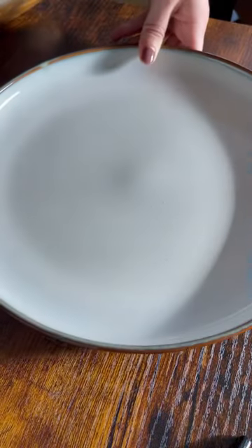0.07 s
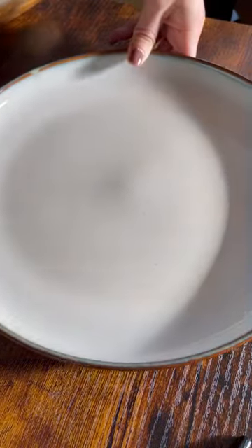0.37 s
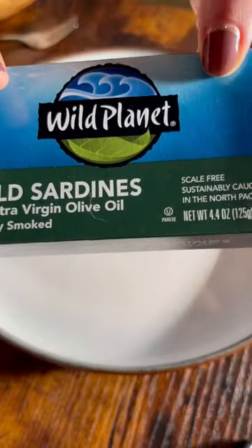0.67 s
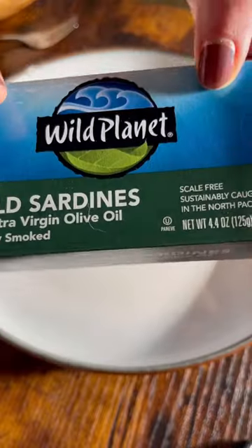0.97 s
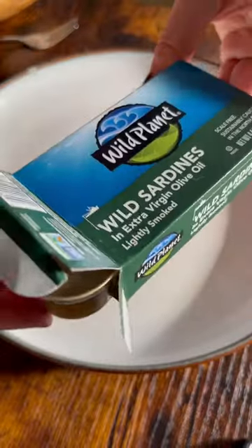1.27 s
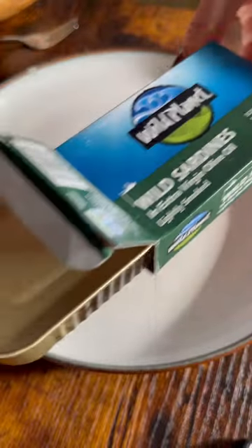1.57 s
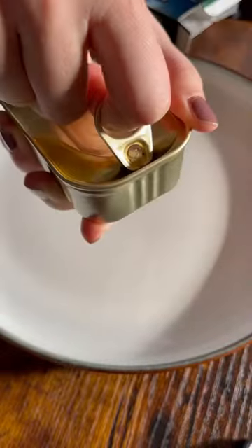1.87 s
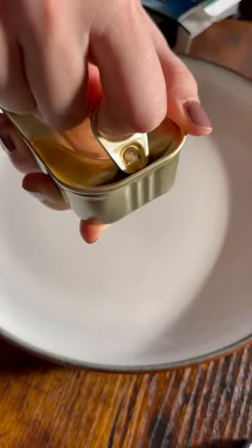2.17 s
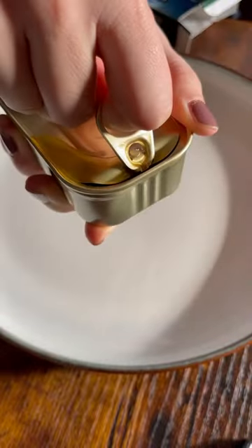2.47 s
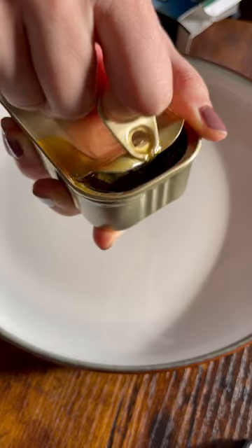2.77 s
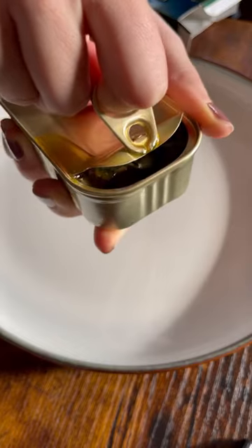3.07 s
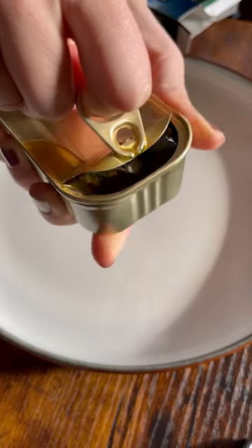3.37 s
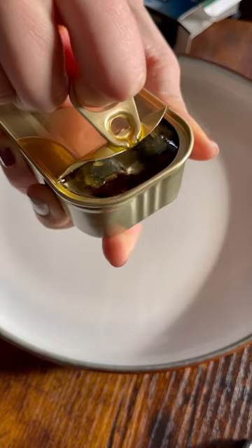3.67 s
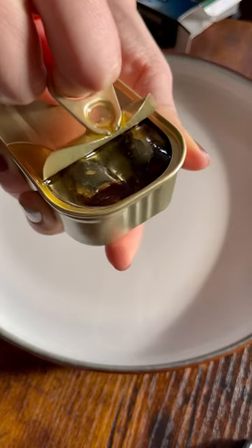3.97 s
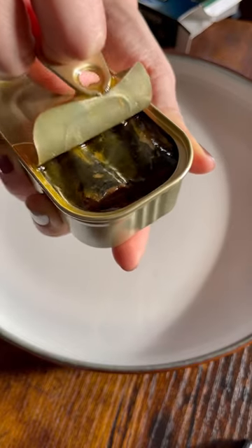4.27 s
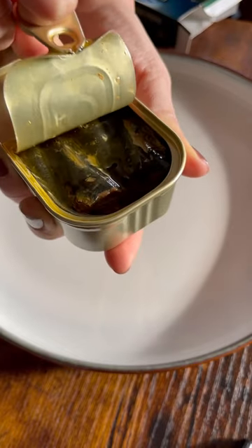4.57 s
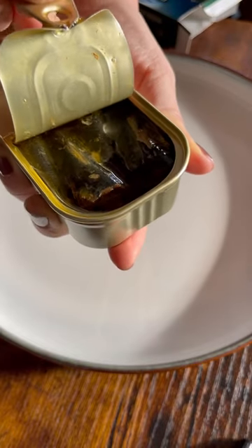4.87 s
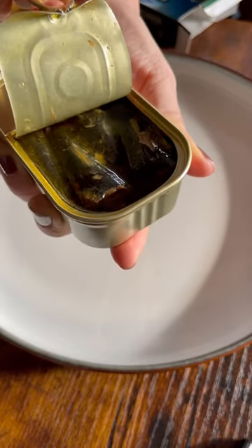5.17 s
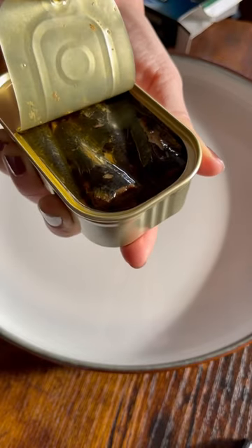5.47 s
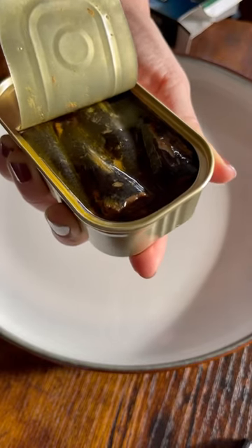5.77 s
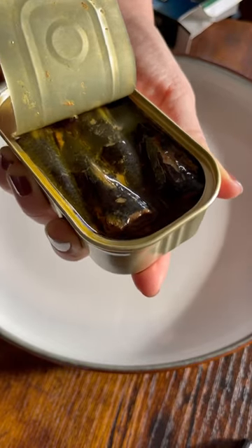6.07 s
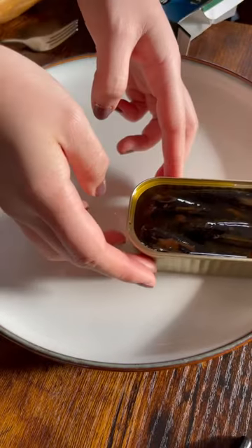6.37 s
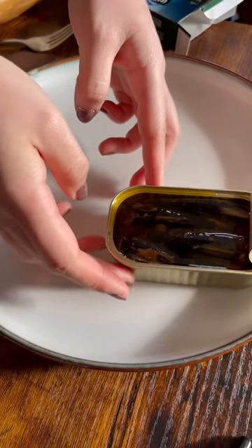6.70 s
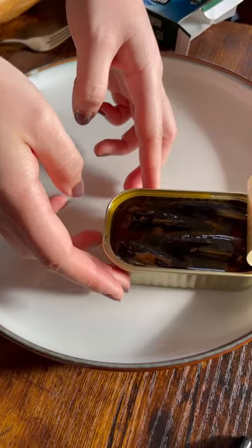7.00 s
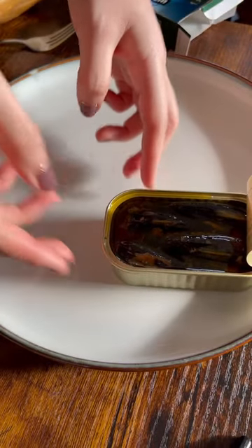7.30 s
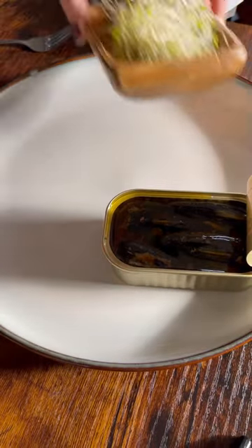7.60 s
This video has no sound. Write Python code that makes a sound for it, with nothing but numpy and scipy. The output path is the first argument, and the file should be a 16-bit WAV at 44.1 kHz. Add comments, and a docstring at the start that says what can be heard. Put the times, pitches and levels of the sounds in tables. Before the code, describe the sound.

Close up in a small, faintly humming room, a plate slides across a wooden table with low thumps. Nails click on a carton and a tin rasps out. A loud, sharp pop breaks the tin's seal, and the lid peels away in surges of thin metallic crackles that get lower and sparser. Finally the tin lands on the plate with a clink and a table thud.

```python
"""A sardine tin is opened: the ring pull pops the seal and the lid tears along its score in small snaps,
its resonance sinking as it comes free. Before that, a plate grinds over a booming wooden table, a fork
jiggles, nails tap a cardboard box and the tin scrapes out of it. Last, the tin is set on the plate.
The loudest hits overload a close microphone; an appliance hums in the small room."""
import sys
import numpy as np
from scipy import signal
from scipy.fft import rfft, irfft
from scipy.io import wavfile
from scipy.ndimage import uniform_filter1d

SR = 44100
rng = np.random.default_rng(int(sys.argv[2]) if len(sys.argv) > 2 else 0)


def transcribe(u):
    """Save the signal u as a 16-bit wav file named by the first command-line argument.

    u: samples, shape (n,) or (channels, n), limited to [-1, 1]; the rate is SR.
    q: integer samples, one column per channel.
    """
    v = np.clip(np.atleast_2d(u).T, -1, 1)
    q = np.round(v * 32767).astype(np.int16)
    wavfile.write(sys.argv[1], SR, q)


N = 345744

# The score gives way. Each row: start in seconds, level in dB.
LID_SNAPS = [(2.5457, -22.5), (2.5932, -9), (2.6695, -4.5), (2.6802, -8), (2.6947, -5), (3.1914, -22.5),
             (3.422, -21.5), (3.4626, -15.5), (3.6308, -19.5), (3.671, -19.5), (3.7851, -18.5),
             (3.8074, -14), (3.8337, -14), (3.863, -16), (3.9, -18.5), (3.9506, -16), (3.991, -16),
             (4.021, -10.5), (4.0359, -7), (4.0554, -7.5), (4.1595, -11), (4.179, -7.5), (4.248, -7.5),
             (4.3089, -11), (4.3452, -18.5), (4.4092, -23), (4.5612, -12.5), (4.725, -14.5), (4.821, -25),
             (5.0485, -21), (5.1273, -13.5), (5.337, -15.5), (5.403, -12), (5.4681, -21), (5.5663, -14),
             (5.6298, -17.5), (5.822, -21), (6.0135, -12)]
# Peeling surges. Each row: peak time in seconds, slip level in dB, rise and fall in seconds.
LID_PULLS = [(2.55, -20, 0.035, 0.098), (2.715, -14.5, 0.1, 0.022), (3.45, -19.5, 0.041, .035),
             (3.82, -21.5, 0.074, 0.063), (4.04, -11.5, 0.061, 0.069), (4.25, -19.5, 0.19, 0.26),
             (4.79, -24.5, 0.089, .07), (5.08, -31.5, 0.087, 0.14), (5.401, -28.5, 0.19, 0.17),
             (5.97, -32, 0.053, .08)]
# Main lid resonance. Each row: time in seconds, pitch in Hz, height in dB, tilt in dB/octave.
LID_TRACK = [(2.68, 3460, 5.5, 2), (3.45, 4150, -1, -1), (3.83, 3850, 13.5, -0.5), (3.96, 3540, 10.5, 1.5),
             (4.05, 3350, 2, 3), (4.25, 3010, 7.5, 2.5), (4.55, 2730, 3.5, -.5), (5.2, 2320, -1, 0.5),
             (6, 2030, 6.5, 1.5)]
# Lid peaks and dips. Each row: ratio to the main pitch, width in octaves, share of the height.
LID_PEAKS = [(.72, 0.11, -0.17), (.92, 0.15, 0.76), (1.04, 0.11, 1), (1.27, 0.27, -0.58), (1.62, .1, .45),
             (1.98, 0.072, 0.31), (2.75, 0.021, 0.52)]
# Lid edge buckling; seal cracking. Each row: start in seconds, energy in dB, decay in seconds.
LID_BUCKLES = [(2.6892, 0.5, 0.0033), (2.6954, 8, 0.0014), (2.702, -11, 0.0022)]
SEAL_POPS = [(2.2306, 23, 0.00091), (2.2326, 18.5, 0.0011)]
# Static resonances. Each row: centre in Hz, width in octaves, height in dB.
TIN_WALL_PEAKS = [(1286, 0.24, 9.5), (1810, 0.046, 0.5), (5270, 0.073, 1.5), (6070, 0.035, 2.5),
                  (8450, 0.054, -0.5), (11400, .04, 2)]
SEALED_LID_PEAKS = [(388, 0.08, 3), (1090, 0.44, 3.5), (1846, 0.24, 6.5), (2241, 0.36, 10),
                    (5330, 0.029, 4.5), (9700, .15, 5)]
SLEEVE_PEAKS = [(1030, 0.21, 4), (1580, 0.075, 5.5), (3000, 0.11, 4.8), (4000, .05, 2.2), (5140, .07, 2.9)]
# Source spectra. Each row: frequency in Hz, relative level in dB.
SNAP_SPECTRUM = [(100, -30), (600, 3), (1200, -0.5), (2200, -0.5), (4600, -0.5), (6200, 0), (8000, -4),
                 (9500, -8), (11000, -6.5), (14000, -14), (16000, -19.5)]
BUCKLE_SPECTRUM = [(200, -47), (1200, -82), (2100, -5), (2800, 4), (3300, -17), (3950, 10), (5100, -17),
                   (6200, 1.5), (7500, -0.5), (11000, -10), (13700, -5), (16000, -32)]
POP_SPECTRUM = [(60, -23.5), (350, -10), (580, -15.5), (1000, -6.5), (2200, -15), (3100, -15.5),
                (3900, -9.5), (5200, -13), (8000, -10), (10500, -12.5), (12000, -16), (16000, -17)]
POP_TAIL_SPECTRUM = [(200, -18.5), (700, -8.5), (1200, 1), (2100, 3), (3300, -6), (6500, -5.5),
                     (8200, -6.5), (10000, -9), (12000, -21.5), (16000, -19.5)]
CARD_SPECTRUM = [(100, -13), (400, -1), (700, -1.5), (1300, -0.5), (2000, -6), (3000, -1.5), (5500, -4.5),
                 (8000, -8), (12000, -16), (16000, -19)]
RIM_SPECTRUM = [(100, -42), (400, -16.5), (1000, -11.5), (1600, -10), (2300, -2), (3200, -6.5), (5200, -7),
                (8000, -13.5), (11000, -22.5), (16000, -22)]
NAIL_SPECTRUM = [(60, -35.5), (400, -2.5), (750, -5.5), (1700, 5), (3000, -3), (4500, -7), (8000, -13.5),
                 (12000, -23), (16000, -27)]
DRAG_SPECTRUM = [(30, -8), (90, 7.5), (160, -8.5), (350, 4.5), (550, -5.5), (1100, -6.5), (1700, -14.5),
                 (3000, -22.5), (6000, -38), (10000, -42.5), (16000, -47.5)]
AIR_SPECTRUM = [(15, -27), (25, -0.5), (93, -8), (193, -10.5), (227, -11), (260, -12), (281, -17.5),
                (389, -18), (482, -26), (848, -35), (1110, -35), (1710, -42.5), (2060, -43), (2300, -47.5),
                (15500, -60.5)]
# Tin on sleeve; rim on flap. Each: peak in dB, starting speed 0-1, drop once free in dB, fade in dB/s.
SLEEVE_STROKE = (-24, 0.04, 10.5, 91)
RIM_STROKE = (-16, 0.525, 23, 900)
# Nails on the box. Each row: start in seconds, level in dB, pitch ratio, click and thud in relative dB.
NAIL_TAPS = [(0.8005, 13, 0.97, 0.5, -12.5), (0.8208, 5, 1.26, -2, -13), (.8617, 0.5, 1.3, 2.5, -10),
             (.864, -1.5, 1.1, 4.5, 7.5), (0.9526, 12.5, 0.94, -6.5, -12.5), (0.9543, 10, 1.05, -9, -14.5),
             (0.9976, 10.5, 0.8, 5, -2.5)]
# Body modes. Each row: frequency in Hz, relative level in dB, T60 in seconds before added damping.
BOX_MODES = [(1260, -8.5, .009), (1680, 8, 0.021), (2045, 6.5, 0.013), (2350, -11.5, 0.003),
             (4100, 1, 0.0098)]
PANEL_MODES = [(247, -22.5, 0.033), (431.4, -7.5, .022), (498, -5.5, 0.023)]
FULL_TIN_MODES = [(1150, 10.5, 0.028), (1900, 5, 0.041), (2030, 11, 0.025), (2897, 5, 0.047),
                  (3150, -13, 0.04), (4500, -17, 0.011), (5730, -17, 0.016), (7100, -23, .02),
                  (9000, -20, 0.017)]
PLATE_MODES = [(673, -26, 0.071), (1065, -8.5, 0.085), (1520, -9, 0.2), (1856, 9, 0.14), (2536, -1.5, 0.15),
               (2891, 4, 0.089), (3176, -7, 0.088), (3622, -20.5, .17), (4150, 5.5, 0.085), (4340, 1, 0.08),
               (5600, 3.5, 0.08), (7250, -17, .2)]
FORK_MODES = [(2490, 0.5, 0.19), (3670, 0, 0.083), (4734, -12, 0.15)]
# Impacts and faint ticks. Each row: start in seconds, energy in dB, tilt in dB/octave.
TIN_STRIKES = [(6.356, -1, 3.5), (6.447, -23, -3)]
PLATE_STRIKES = [(6.3554, -3, -12.5), (6.444, -33, -6.5)]
FORK_STRIKES = [(.385, -22.5, 2), (0.409, -33, 20), (0.465, -29.5, 23), (0.477, -29, 10)]
DRY_TICKS = [(0.592, -20, -2), (1.8165, -18, -2), (3.367, -30, 6), (4.9239, -16.5, 15), (5.648, -18, 3),
             (6.1508, -19.5, 11.5), (6.2035, -21, -2)]
# Table top booms. Each row: start in seconds, energy in dB, frequency in Hz, T60 in seconds.
TABLE_BOOMS = [(.01, 1, 84.6, 0.85), (.168, 9.5, 83.6, 1), (0.194, 10, 36.3, 0.28),
               (0.214, 8.5, 77.8, 0.45), (6.364, 6, 85, 0.56)]
# Dull contacts. Each row: start in seconds, energy in dB, centre in Hz, width in octaves.
DULL_TOUCHES = [(1.068, -21, 4970, 1), (4.113, -15, 2470, 0.17), (5.717, -25.5, 1970, .32),
                (5.924, -27.5, 2050, .4), (6.281, -21.5, 2350, 0.13), (6.693, -22, 1450, 0.33),
                (6.997, -36, 4500, .76), (7.15, -34.5, 3000, 0.55)]
# Skin brushing. Each row: start and length in seconds, peak rms in dB, centre in Hz, width in octaves.
SKIN_RUBS = [(0.65, 0.12, -62.5, 2790, 0.22), (0.835, 0.075, -44, 3000, 0.9),
             (0.887, 0.071, -36.5, 1930, 0.51), (0.985, 0.092, -47, 1900, 1.5), (1.02, .2, -55, 4500, 0.96),
             (2.092, 0.09, -59.5, 6030, 0.27), (3.187, 0.16, -64, 9000, 0.67),
             (5.508, 0.42, -56, 880, 1.04), (5.901, 0.21, -50, 477, 0.14), (6.213, 0.095, -62.5, 3000, .7),
             (7.266, 0.36, -59, 2430, 1.05)]
# Appliance tones. Each row: frequency in Hz, rms in dB.
HUM_TONES = [(32.5, -41.5), (56.3, -40), (73.5, -48), (221.2, -43.5), (258.3, -47)]
# Room hiss. Each row: time in seconds, gain above 500 Hz in dB.
HISS_GAIN = [(0, 4), (1.75, -2), (1.85, 4), (7.84, 0.67)]
# Room decay. Each row: frequency in Hz, T60 in seconds.
ROOM_T60 = [(200, 0.1), (800, .28), (2200, .31), (3200, 0.21), (5000, 0.12), (9000, 0.17), (15000, .16)]


def lid_tear(slips=300, drop_db=10, spread_db=4.5):
    """The score tears in surges of small, dull slips, with loud snaps where it holds and then gives."""
    out = np.zeros(N)
    slots_s = np.linspace(LID_PULLS[0][0] - 0.1, LID_PULLS[-1][0] + 0.15, slips + 1)
    times_s = slots_s[:-1] + np.diff(slots_s) * rng.random(slips)
    surges_db = [db + swell_db(times_s, s, drop_db / rise, drop_db / fall)
                 for s, db, rise, fall in LID_PULLS]
    scatter = np.clip(rng.standard_normal((slips, 2)), -1.6, 1.6)
    for s, db, (size, shade) in zip(times_s, np.max(surges_db, axis=0), scatter):
        add(out, s, amp(db + spread_db * size) * lid_snap(s, tilt_db_oct=1.5 * shade - 2.5))
    for s, db, decay_s in LID_BUCKLES:
        add(out, s, amp(db) * burst(decay_s, curve(BUCKLE_SPECTRUM, bins()), direct=0.77))
    for s, db in LID_SNAPS:
        add(out, s, amp(db) * lid_snap(s))
    return out


def lid_snap(s, tilt_db_oct=0, flex=0.033):
    """One step of the tear, coloured by the tin walls and the freed lid, which rings on."""
    times_s, *columns = np.transpose(LID_TRACK)
    hz, height_db, bright_db_oct = (np.interp(s, times_s, column) for column in columns)
    hz *= 1 + flex * rng.standard_normal()  # flexing shifts the pitch
    body_db = peaks_db(TIN_WALL_PEAKS) + height_db * peaks_db(LID_PEAKS, hz)
    slope_db = (bright_db_oct + tilt_db_oct) * np.log2(bins())
    crack = burst(0.0017, curve(SNAP_SPECTRUM, bins()) + body_db + slope_db, direct=0.67)
    return crack + amp(-12.5) * ring([(1.02 * hz, 0, 0.033)], size=len(crack))


def seal_pop(tail_db=2, tail_decay_s=0.045):
    """The pull punches through with a hard crack; a smooth noisy tail dies away after it."""
    out = np.zeros(N)
    crack_db = curve(POP_SPECTRUM, bins()) + peaks_db(SEALED_LID_PEAKS)
    for s, db, decay_s in SEAL_POPS:
        add(out, s, amp(db) * burst(decay_s, crack_db, direct=1.2))
    tail = burst(tail_decay_s, curve(POP_TAIL_SPECTRUM, bins()), size=12000)
    add(out, SEAL_POPS[0][0], amp(tail_db) * tail)
    return out


def tin_slide(sleeve_s=(1.12, 1.422), rim_s=(1.523, 1.568)):
    """The tin scrapes over the fibres of the hollow sleeve, then its rim passes the flap."""
    fibres = friction(slips_per_s=900, spread_db=3.5, hiss=1.0)
    scrape = 0.75 * fibres + 0.65 * seam_snags(sleeve_s[0], rim_s[1])
    out = np.zeros(N)
    strokes = (sleeve_s, SLEEVE_STROKE, CARD_SPECTRUM), (rim_s, RIM_STROKE, RIM_SPECTRUM)
    for span_s, stroke, spectrum in strokes:
        sleeve = unit_energy(colour(np.ones(1), curve(spectrum, bins()) + peaks_db(SLEEVE_PEAKS)))
        out += signal.oaconvolve(scrape, sleeve)[:N] * scrape_gain(*span_s, *stroke)
    return out


def seam_snags(start_s, end_s, count=110):
    """The tin's seam snags on the card, each snag randomly coloured; rms 1 over the span."""
    out = np.zeros(N)
    for s in start_s + (end_s - start_s) * (np.arange(count) + rng.random(count)) / count:
        ripple_db = 5 * unit_rms(uniform_filter1d(rng.standard_normal(len(bins())), 24))
        add(out, s, amp(2 * rng.standard_normal()) * burst(0.003, ripple_db))
    return unit_energy(out) * np.sqrt((end_s - start_s) * SR)


def scrape_gain(start_s, free_s, peak_db, first_speed, drop_db, fade_db_per_s):
    """A scrape grows with its rising speed, drops as it slips free, and fades."""
    t = np.arange(N) / SR
    speed = np.interp(t, [start_s, free_s], [first_speed, 1], left=0)
    release_db = (t > free_s) * (drop_db + fade_db_per_s * (t - free_s))
    return speed ** 2.01 * amp(peak_db - release_db)


def box_taps():
    """Nails knock on the full carton: a click, a short hollow ring and a panel thud."""
    out = np.zeros(N)
    thud = ring(PANEL_MODES, size=4000)
    for s, db, pitch, click_db, thud_db in NAIL_TAPS:
        hollow = ring(BOX_MODES, pitch, damping=1.2, size=4000)
        add(out, s, amp(db - 1.5) * (hollow + amp(thud_db) * thud))
        add(out, s, amp(db + click_db) * burst(0.0017, curve(NAIL_SPECTRUM, bins()), direct=0.7))
    return out


def plate_drag(peak_s=0.16):
    """The foot ring grinds over wood, speeding up then coasting, and sets the china singing."""
    grind = friction(slips_per_s=1300, spread_db=0.5, hiss=0.99)
    gain = amp(-26 + swell_db(np.arange(N) / SR, peak_s, rise_db_per_s=63, fall_db_per_s=110))
    wood = unit_rms(colour(grind, curve(DRAG_SPECTRUM, bins()))[:N])
    china = signal.fftconvolve(grind * gain, ring(PLATE_MODES, damping=2.1))[:N]
    return wood * gain + amp(-13) * china


def table_impacts():
    """The oil-damped tin lands on the plate and rocks once; a fork jiggles; the table top booms."""
    out = np.zeros(N)
    bodies = (PLATE_MODES, PLATE_STRIKES), (FULL_TIN_MODES, TIN_STRIKES), (FORK_MODES, FORK_STRIKES)
    for modes, strikes in bodies:
        for s, db, tilt in strikes:
            add(out, s, amp(db) * ring(modes, tilt_db_oct=tilt))
    for s, db, hz, t60_s in TABLE_BOOMS:
        add(out, s, amp(db) * ring([(hz, 0, t60_s)]))
    return out


def handling(touch_decay_s=0.0025):
    """Fingers, tin and table touch dully; skin brushes card and metal."""
    out = np.zeros(N)
    for s, db, hz, octaves in DULL_TOUCHES:
        add(out, s, amp(db) * burst(touch_decay_s, hump_db(hz, octaves)))
    skin = friction(slips_per_s=1800, spread_db=3.5, hiss=0.91)
    for s, length_s, db, hz, octaves in SKIN_RUBS:
        stroke = skin[round(s * SR):][:round(length_s * SR)]
        rub = unit_rms(colour(stroke, hump_db(hz, octaves))[:len(stroke)])
        add(out, s, amp(db) * rub * np.hanning(len(rub)))
    return out


def ticks(decay_s=0.00008):
    """Thin clicks with no ring."""
    out = np.zeros(N)
    click = np.exp(-np.arange(200) / SR / decay_s)
    for s, db, tilt_db_oct in DRY_TICKS:
        add(out, s, amp(db) * unit_energy(colour(click, tilt_db_oct * np.log2(bins()))))
    return out


def room_echo(x, onset_s=0.0022):
    """Dense reflections, each band dying at its own rate."""
    hz, t, bands = signal.stft(rng.standard_normal(22050), SR, nperseg=256)
    decay = amp(-60 * t / curve(ROOM_T60, hz)[:, None])
    tail = signal.istft(bands * decay, SR, nperseg=256)[1]
    tail *= np.clip(np.arange(len(tail)) / SR / onset_s - 0.5, 0, 1)
    return signal.fftconvolve(x, unit_energy(tail))[:N]


def appliance_hum(waver_db=0.23, waver_rad=0.24):
    """Low tones wavering in level and phase."""
    t = np.arange(N) / SR
    out = np.zeros(N)
    for hz, db in HUM_TONES:
        gain = np.sqrt(2) * amp(db + waver_db * drift(top_hz=3))
        out += gain * np.sin(2 * np.pi * hz * t + waver_rad * drift(top_hz=1.6))
    return out


def room_air(level_db=-41):
    """Rumble and hiss; the hiss sinks, steps back up, then sinks slowly."""
    t, hz = np.arange(N) / SR, bins(N)
    shape = amp(curve(AIR_SPECTRUM, hz)) * hz / (hz + 15)
    air = amp(level_db) * unit_rms(irfft(rfft(rng.standard_normal(N)) * shape, N))
    hiss = signal.sosfiltfilt(signal.butter(2, 500, "high", fs=SR, output="sos"), air)
    return air + hiss * (amp(np.interp(t, *np.transpose(HISS_GAIN))) - 1)


def burst(decay_s, gain_db, direct=0, size=1024, rise_s=0.0001):
    """A click, part direct and part scattered through a thin wall; energy 1."""
    t = np.arange(size) / SR
    scatter = unit_energy(rng.standard_normal(size) * np.exp(-t / decay_s) * (1 - np.exp(-t / rise_s)))
    return unit_energy(colour(scatter + direct * (t == 0), gain_db))


def ring(modes, pitch=1, tilt_db_oct=0, damping=1, size=20000):
    """Dying modes of a struck body; energy 1."""
    t = np.arange(size) / SR
    out = np.zeros(size)
    for hz, db, t60_s in modes:
        envelope = amp(db + tilt_db_oct * np.log2(hz) - 60 * t * damping / t60_s)
        out += envelope * np.sin(2 * np.pi * hz * pitch * t)
    return unit_energy(out)


def friction(slips_per_s, spread_db, hiss):
    """Tiny uneven slips over smooth hiss; rms 1."""
    sizes = amp(spread_db * np.minimum(rng.exponential(1, N), 4)) * rng.choice([-1, 1], N)
    slips = unit_rms(sizes * (rng.random(N) < slips_per_s / SR))
    return unit_rms(slips + hiss * rng.standard_normal(N))


def drift(top_hz):
    """Slow random wander; rms 1."""
    t = np.linspace(0, N / SR, 800)
    rates_hz = np.geomspace(top_hz / 10, top_hz, 20)
    slow = sum(np.sin(2 * np.pi * (hz * t + rng.random())) for hz in rates_hz)
    return np.interp(np.arange(N) / SR, t, unit_rms(slow))


def colour(x, gain_db):
    """Minimum-phase filter: rings only after each blow."""
    log_gain = np.log(amp(np.concatenate([gain_db, gain_db[-2:0:-1]])))
    response = np.exp(np.conj(signal.hilbert(log_gain)))[:len(gain_db)]
    return signal.fftconvolve(x, irfft(response))


def swell_db(t, peak_s, rise_db_per_s, fall_db_per_s):
    return np.minimum(rise_db_per_s * (t - peak_s), fall_db_per_s * (peak_s - t))


def peaks_db(rows, pitch=1):
    return sum(db * amp(hump_db(hz * pitch, octaves)) for hz, octaves, db in rows)


def hump_db(hz, octaves):
    return -20 * np.log10(1 + (np.log2(bins() / hz) / octaves) ** 2)


def curve(points, hz):
    """Interpolates on a log-frequency axis."""
    points_hz, values = np.transpose(points)
    return np.interp(np.log(hz + 1), np.log(points_hz), values)


def bins(size=2048):
    return np.fft.rfftfreq(size, 1 / SR) + 1


def amp(db):
    return 10 ** (np.asarray(db) / 20)


def unit_energy(x):
    return x / np.sqrt(np.sum(x ** 2) + 1e-20)


def unit_rms(x):
    return unit_energy(x) * np.sqrt(len(x))


def add(mix, start_s, sound):
    part = mix[max(round(start_s * SR), 0):][:len(sound)]
    part += sound[:len(part)]


def scene():
    """Mono mix of sources, echo and background."""
    table = plate_drag() + table_impacts()
    taps, slide, pop, tear, hands = box_taps(), tin_slide(), seal_pop(), lid_tear(), handling()
    echo = room_echo(amp(-13) * tear + amp(-21) * pop + amp(-18) * slide + amp(-20) * taps
                     + amp(-17) * (table + hands))
    close = tear + pop + slide + taps + table + hands + ticks()
    return (close + echo + room_air() + appliance_hum())[None]


def record(dry):
    """The loudest hits clip at full scale; a low-pass follows."""
    lowpass = signal.firwin(511, cutoff=15850, window=("kaiser", 9), fs=SR)
    return signal.oaconvolve(np.clip(dry, -1, 1), lowpass[None], "same")


dry = scene()
out = record(dry)
transcribe(out)
```